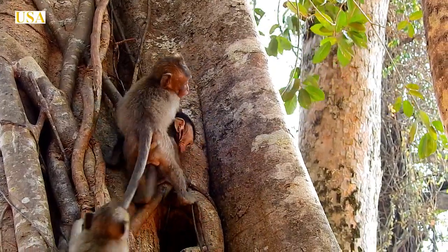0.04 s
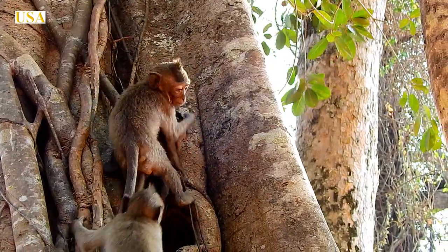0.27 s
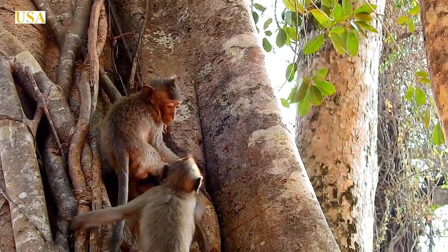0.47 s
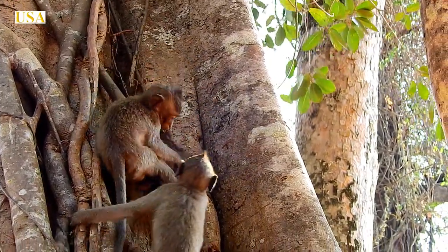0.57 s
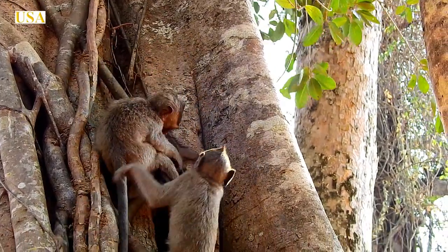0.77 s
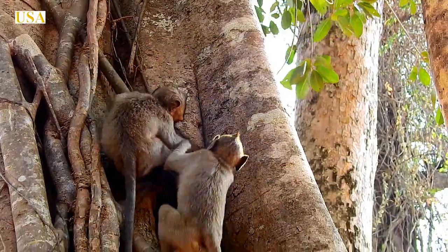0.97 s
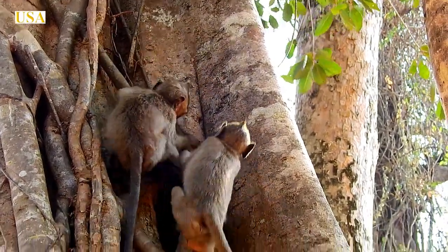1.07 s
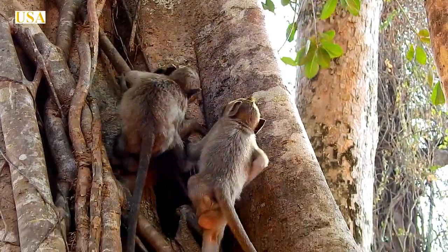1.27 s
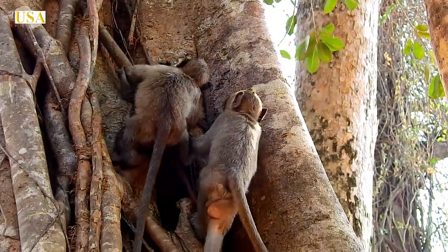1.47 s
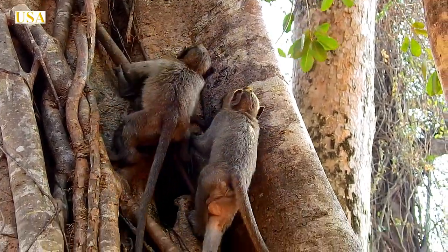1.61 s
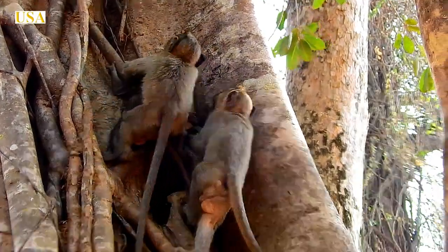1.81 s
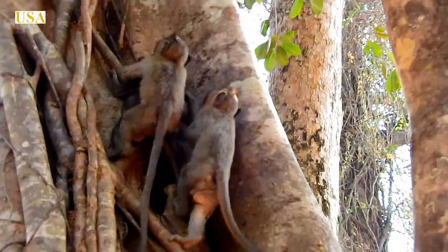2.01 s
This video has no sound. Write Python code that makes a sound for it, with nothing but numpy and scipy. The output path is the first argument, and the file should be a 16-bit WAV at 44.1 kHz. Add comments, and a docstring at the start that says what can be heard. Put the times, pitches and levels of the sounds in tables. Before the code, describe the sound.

A baby monkey screams three times in quick succession, its shrill voice flipping between whistle and rasp and echoing briefly off trees. Behind it are a low forest rumble, soft wind on the microphone and a final faint scuff on bark.

```python
"""A low distant forest rumble, the dying echo of a cry and a puff of wind; then a baby monkey screams
three times. Its voice is two shrill tones, near 6.5 and 4.4 kHz, that flip between clean whistle
and harsh rasp, with a hoarse overtone band near 10 kHz. Trunks scatter the cries. Wind brushes the
left microphone again before the third scream; feet scuff the bark at the end."""
import sys
import numpy as np
from scipy import signal
from scipy.fft import rfft, irfft
from scipy.io import wavfile
from scipy.ndimage import uniform_filter1d

SR = 44100
rng = np.random.default_rng(int(sys.argv[2]) if len(sys.argv) > 2 else 0)


def bounce(signal):
    """Save signal as a 16-bit WAV file at the path given by the first command-line argument."""
    frames = np.transpose(np.atleast_2d(signal))
    limited = np.clip(frames, -1, 1)
    pcm = np.round(limited * 32767).astype(np.int16)
    wavfile.write(sys.argv[1], SR, pcm)


N = 90404

# background spectrum and its stereo side filter (frequency [Hz], gain [dB])
FOREST_EQ = [(33, -21), (55, -1), (135, 2), (221, -7), (620, -18.5), (1140, -17), (3140, -20),
             (3740, -28.5), (6700, -27), (11000, -57.5)]
FOREST_SIDE_EQ = [(60, -11.5), (250, -25), (2000, -11.5)]
# wind buffets (centre [s], half width [s], level [dB])
WIND_GUSTS = [(0.109, 0.029, -41.5), (1.238, 0.12, -46.5)]
# echoes: big trunk, woods, earlier cry, stereo side (frequency [Hz], gain [dB])
TRUNK_EQ = [(2500, -8.5), (6500, 3), (9500, 7)]
WOODS_EQ = [(4300, 5), (7000, 0.5), (9000, 8.5), (15000, -26.5)]
DYING_ECHO_EQ = [(3000, -6.5), (4500, 6.5), (6500, 1.5), (12000, -61)]
ECHO_SIDE_EQ = [(3500, -8), (8000, -2)]
# feet on bark (start [s], decay [s], knock pitch [Hz], knock level [dB], scrape level [dB])
FOOT_SCUFFS = [(1.817, 0.019, 827, -45.5, -49), (1.921, 0.11, 1080, -50.5, -50.5)]
# bark scrape spectrum (frequency [Hz], gain [dB])
BARK_EQ = [(1200, -10.5), (6500, 2), (14000, -32)]
# clean squeaks (start [s], length [s], start pitch [Hz], mid pitch [Hz], end pitch [Hz], level [dB])
SQUEAK_GLIDES = [(1.458, 0.053, 5050, 5340, 5580, -42.5), (1.487, 0.016, 5420, 5410, 5490, -29.5),
                 (1.786, 0.025, 5450, 4607, 3930, -29.5)]
# voice crack ending cry 2, one table per tone (time [s], pitch [Hz], level [dB])
CRACK_TONES = [
    [(1.002, 3950, -39), (1.03, 3700, -30.5), (1.05, 3150, -30.5), (1.063, 3200, -45)],
    [(1.017, 2750, -37.5), (1.034, 2600, -44)],
]
# the two voice tones, one table per cry (time [s], pitch [Hz], roughness [0 = clean], level [dB])
UPPER_TONE = [
    [(.184, 6250, 0.46, -54.5), (.199, 6200, 0, -30), (.204, 6266, .66, -21), (.234, 6520, 0.54, -18.5),
     (.256, 7057, 0.8, -29.5), (.262, 6820, 0, -19), (.286, 5800, 0.02, -22.5), (.294, 6434, 0.59, -20),
     (.35, 6590, 0.58, -21.5), (.42, 6287, 0.75, -25), (.447, 5737, 0.6, -20), (.481, 5608, 0.48, -22)],
    [(.778, 6400, 0.88, -46), (.792, 6300, 1.23, -43), (.802, 6420, 0.65, -20), (.816, 6500, 0.73, -25),
     (.824, 7750, 0.74, -28), (.838, 7400, 0.8, -32), (.849, 6450, 0.23, -23.5), (.86, 5964, 0.69, -25),
     (.901, 6570, .55, -27), (.96, 6400, 0.86, -28), (1.0, 6380, 0.1, -24.5), (1.016, 6535, 1.19, -28.5),
     (1.068, 6510, 0.63, -34.5)],
    [(1.557, 7390, .4, -36), (1.58, 6710, 0.26, -29.5), (1.602, 6950, 0.41, -32.5),
     (1.617, 6430, 0.19, -33.5), (1.643, 6324, 0.26, -24.5), (1.672, 6475, 0.23, -35.5),
     (1.74, 6660, 1.1, -40.5), (1.762, 5670, 0.36, -29.5), (1.783, 5620, 0.3, -28.5)],
]
LOWER_TONE = [
    [(.194, 3746, 0.08, -34), (.255, 3900, 0.88, -67), (.298, 4500, 0.27, -28.5), (.345, 4400, 0.66, -40),
     (.379, 4636, 0.41, -19), (.394, 4197, 0.28, -24.5), (.445, 4703, 0.62, -22), (.48, 4477, 0.62, -30.5)],
    [(.804, 4490, 0.78, -22), (.832, 5190, 0.58, -30.5), (.848, 4550, 0.12, -21), (.86, 4490, 0.82, -26.5),
     (.942, 4445, 0.27, -23), (.96, 4586, 0.4, -18), (1.008, 4684, 1.15, -29.5), (1.026, 4685, 0.11, -14.5),
     (1.039, 4446, 0.57, -17.5), (1.052, 4453, 0.28, -16.5), (1.063, 4160, 0, -22)],
    [(1.577, 4520, 0.17, -31), (1.606, 4740, 0.38, -37.5), (1.648, 4260, 0.14, -28.5),
     (1.72, 4412, 0.42, -31), (1.76, 4010, 0.62, -25), (1.785, 3970, 0.4, -36)],
]
# overtone envelope, one table per cry (time [s], level [dB])
OVERTONE_LEVELS = [
    [(.206, -50.5), (.25, -54), (.408, -44), (.48, -60)],
    [(.805, -57), (.845, -59), (.956, -43.5), (1.06, -59)],
    [(1.575, -52), (1.665, -58.5), (1.697, -49.5), (1.795, -54.5)],
]
# overtone band; throat and mouth resonances (frequency [Hz], gain [dB])
OVERTONE_EQ = [(3000, -51), (8300, -6), (9900, 3.5), (12200, -17), (16000, -36)]
THROAT_EQ = [(3000, -17), (3900, -10), (5700, -1), (7400, -0.5), (8400, -9)]

UPPER_SPREAD_HZ, LOWER_SPREAD_HZ, RASP_SPREAD_HZ = 420, 172, 1300
FLIP_DEPTH, FLIP_HZ = 0.27, 37.8  # random flips between whistle and rasp
JITTER_DEPTH, JITTER_HZ = 0.045, 77.8
GROWL_HZ, GROWL_DEPTH, GROWL_SCATTER = 477.5, 0.51, 0.22  # irregular beating
FLUTTER_DB, FLUTTER_HZ = 3.87, 109
TIME_S = np.arange(N) / SR


def undb(db):
    """Decibels to gain."""
    return 10 ** (np.asarray(db) / 20)


def unit(x):
    """Scale to rms 1."""
    return x / np.sqrt(np.mean(np.abs(x) ** 2) + 1e-20)


def curve(rows, column=1):
    """Table column, linear in time between rows."""
    rows = np.array(rows, float)
    return np.interp(TIME_S, rows[:, 0], rows[:, column])


def envelope(rows, column=1, attack_s=0.0073, release_s=0.0068):
    """Gain from a dB column; attack before the first row, release after the last."""
    before_s = np.maximum(rows[0][0] - TIME_S, 0)
    after_s = np.maximum(TIME_S - rows[-1][0], 0)
    return undb(curve(rows, column)) * np.exp(-before_s / attack_s - after_s / release_s)


def colour(x, eq):
    """Filter by (frequency [Hz], gain [dB]) points."""
    hz, db = np.array(eq, float).T
    bins_hz = np.maximum(np.fft.rfftfreq(N, 1 / SR), 1)
    return irfft(rfft(x) * undb(np.interp(np.log(bins_hz), np.log(hz), db)), N)


def noise(eq):
    """Coloured noise, rms 1."""
    return unit(colour(rng.standard_normal(N), eq))


def wobble(spread_hz):
    """Complex random motion, bell-shaped spectrum, rms 1."""
    bins_hz = np.fft.fftfreq(N, 1 / SR)
    white = rng.standard_normal(N) + 1j * rng.standard_normal(N)
    return unit(np.fft.ifft(np.exp(-(bins_hz / spread_hz / 2) ** 2) * white))


def forest(level_db=-51):
    """Distant rumble and soft air, mostly alike in both ears."""
    side = colour(noise(FOREST_EQ), FOREST_SIDE_EQ)
    return undb(level_db) * (noise(FOREST_EQ) + np.array([side, -side]))


def wind():
    """Soft low buffets on the left microphone only."""
    swell = sum(undb(db) * np.exp(-((TIME_S - centre_s) / half_s) ** 2)
                for centre_s, half_s, db in WIND_GUSTS)
    buffets = swell * noise([(120, 0), (600, -36), (SR / 2, -90)])
    return np.array([buffets, np.zeros(N)])


def echo_tail(t60_s, delay_s=0):
    """Dense decaying reflections, energy 1."""
    reflections = rng.standard_normal(N) * undb(-60 * TIME_S / t60_s) * (TIME_S > delay_s)
    return unit(reflections) / np.sqrt(N)


def trees(x, trunk_db=-6.5, woods_db=-12, dying_db=-49.5, fade_db_per_s=36):
    """Echoes of x off a big trunk and the woods, plus the dying echo of an earlier cry."""
    woods = undb(woods_db) * colour(echo_tail(t60_s=0.35, delay_s=0.0008), WOODS_EQ)
    trunk = undb(trunk_db) * colour(echo_tail(t60_s=0.053), TRUNK_EQ)
    dying_echo = noise(DYING_ECHO_EQ) * undb(dying_db - fade_db_per_s * TIME_S)
    return signal.fftconvolve(x, (trunk + woods)[:N // 2])[:N] + dying_echo


def scuffs(attack_s=0.011, grain_db=3, grain_hz=170):
    """Each foot lands with a dull knock and drags grainily over bark."""
    out = 0
    for start_s, decay_s, hz, knock_db, scrape_db in FOOT_SCUFFS:
        rise = np.clip((TIME_S - start_s) / attack_s, 0, 1)
        fall = np.exp(-np.maximum(TIME_S - start_s - attack_s, 0) / decay_s)
        knock = noise([(hz / 8, -10), (hz * 0.84, -14), (hz, 0), (hz * 1.11, -14), (hz * 8, -45)])
        scrape = unit(noise(BARK_EQ) * undb(grain_db * wobble(grain_hz).real))
        out += rise * fall * (undb(knock_db) * knock + undb(scrape_db) * scrape)
    return out


def tone(hz, rough, spread_hz=LOWER_SPREAD_HZ, waver=1):
    """Complex voice oscillation; roughness adds pitch jitter, beating and chaos at bounded strength."""
    rough = np.clip(rough * (1 + FLIP_DEPTH * wobble(FLIP_HZ).real), 0, 1)
    pitch_hz = hz * (1 + waver * JITTER_DEPTH * rough * wobble(JITTER_HZ).real)
    phase = 2 * np.pi * np.cumsum(pitch_hz) / SR
    beat_hz = GROWL_HZ * (1 + GROWL_SCATTER * wobble(JITTER_HZ).real)
    beat = np.cos(2 * np.pi * np.cumsum(beat_hz) / SR)
    swing = 1 - rough + rough * wobble(spread_hz)
    swing /= np.hypot(np.abs(swing), 0.5)  # soft saturation
    swing *= 1 + GROWL_DEPTH * rough * beat
    swing /= np.sqrt(uniform_filter1d(np.abs(swing) ** 2, size=220) + 1e-9)  # level over 5 ms
    return np.sqrt(2) * swing * np.exp(1j * phase)


def squeak(start_s, length_s, start_hz, mid_hz, end_hz, level_db, octave_db=-41):
    """Nearly pure glide with a faint octave."""
    progress = np.clip((TIME_S - start_s) / length_s, 0, 1)
    pitch_hz = curve([(start_s, start_hz), (start_s + length_s / 2, mid_hz), (start_s + length_s, end_hz)])
    whistle = tone(pitch_hz, rough=0.2556)
    octave = undb(octave_db) * (whistle ** 2).real
    return undb(level_db) * np.sin(np.pi * progress) * (whistle.real + octave)


def cry(upper, lower, overtone_levels, rasp_db=-2.5, hiss_db=-26.5, octave_db=-1):
    """Two tones, rasp where they clash, slight hiss, and the lower tone's octave in a band of noise."""
    rough = curve(upper, column=2)
    high_gain, low_gain = envelope(upper, column=3), envelope(lower, column=3)
    high = tone(curve(upper), rough, UPPER_SPREAD_HZ)
    low = tone(curve(lower), curve(lower, column=2), waver=2)
    clash = rough * np.minimum(high_gain, low_gain)
    rasp = undb(rasp_db) * clash * (high * wobble(RASP_SPREAD_HZ)).real
    octave = undb(octave_db) * unit(colour((low ** 2).real, OVERTONE_EQ))
    overtones = envelope(overtone_levels) * unit(octave + noise(OVERTONE_EQ))
    hiss = undb(hiss_db) * rng.standard_normal(N)
    voice = high_gain * (high.real + hiss) + low_gain * low.real + rasp
    flutter = undb(FLUTTER_DB * rough * wobble(FLUTTER_HZ).real)
    return (colour(voice, THROAT_EQ) + overtones) * flutter


def monkey():
    """Three cries: the second cracks into two lower tones, squeaks frame the third."""
    crack = sum(envelope(rows, column=2) * tone(curve(rows), rough=0.504).real for rows in CRACK_TONES)
    cries = sum(cry(*tables) for tables in zip(UPPER_TONE, LOWER_TONE, OVERTONE_LEVELS))
    squeaks = sum(squeak(*row) for row in SQUEAK_GLIDES)
    return cries + squeaks + crack


def scene():
    """Monkey straight ahead, echo wider in the treble, forest all around, wind left."""
    direct = monkey() + scuffs()
    side = colour(trees(direct), ECHO_SIDE_EQ)
    return direct + trees(direct) + np.array([side, -side]) + forest() + wind()


def record(dry, threshold_db=-22.5, ratio=1.52, average_s=0.018, low_cut_hz=39, high_cut_hz=15600):
    """Compress the loudest screams; cut deep bass and top treble."""
    pole = np.exp(-1 / (average_s * SR))
    rms = np.sqrt(signal.lfilter([1 - pole], [1, -pole], np.mean(dry ** 2, axis=0)))
    x = dry * np.maximum(rms / undb(threshold_db), 1) ** (1 / ratio - 1)
    x = signal.sosfilt(signal.butter(2, low_cut_hz, "high", fs=SR, output="sos"), x)
    return signal.sosfilt(signal.ellip(10, 0.2, 80, high_cut_hz, fs=SR, output="sos"), x)


dry = scene()
out = record(dry)
bounce(out)
```